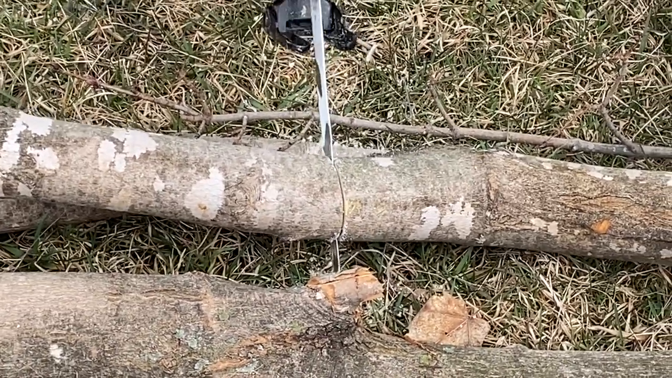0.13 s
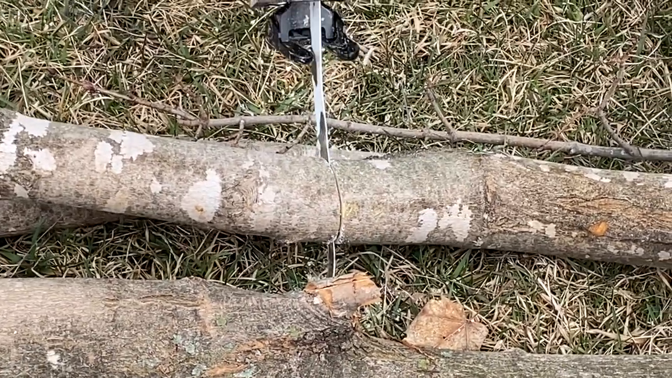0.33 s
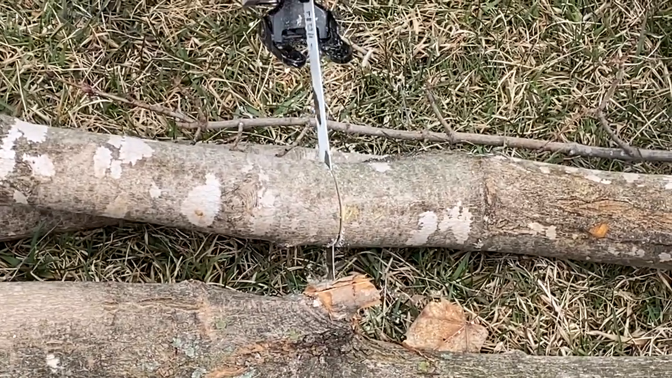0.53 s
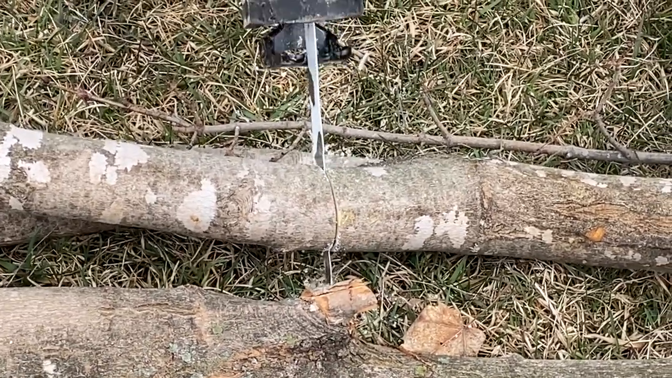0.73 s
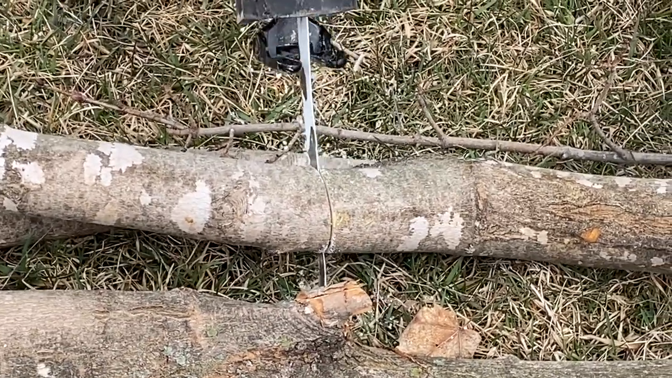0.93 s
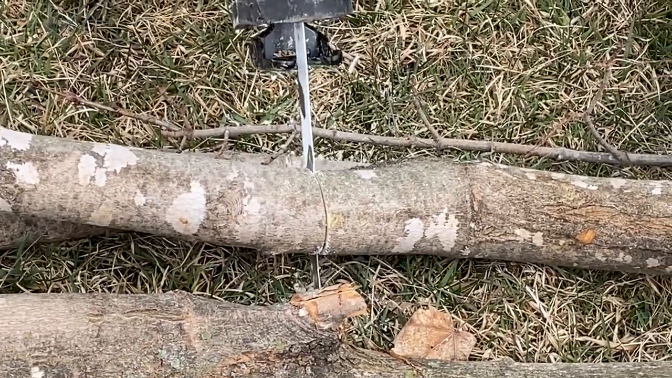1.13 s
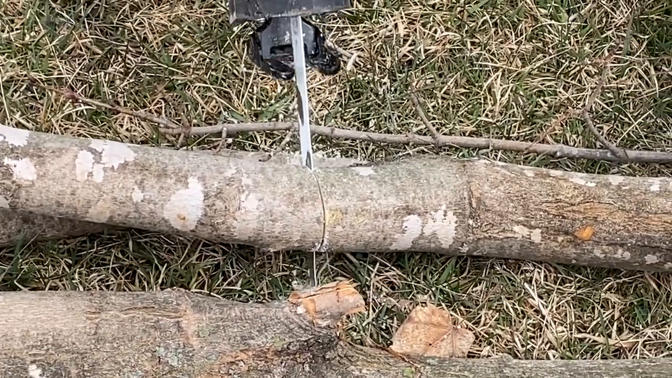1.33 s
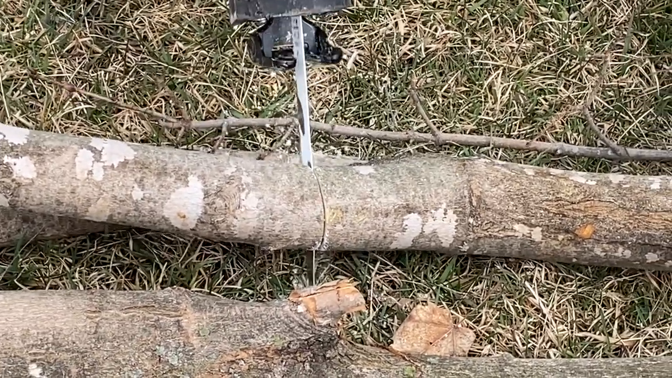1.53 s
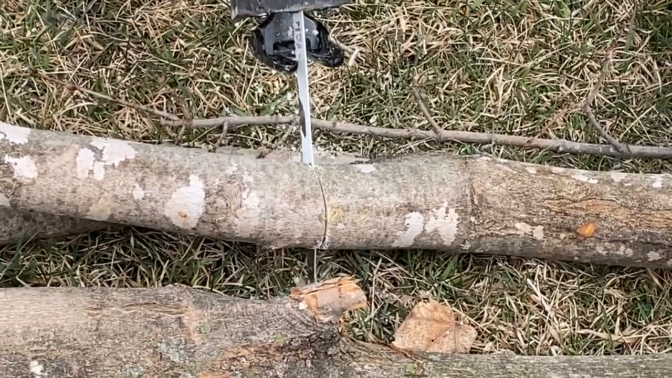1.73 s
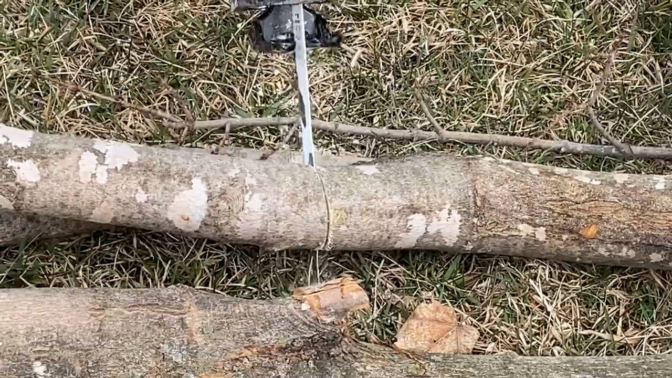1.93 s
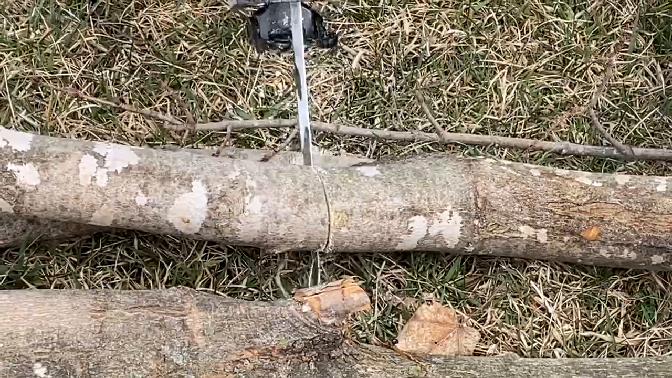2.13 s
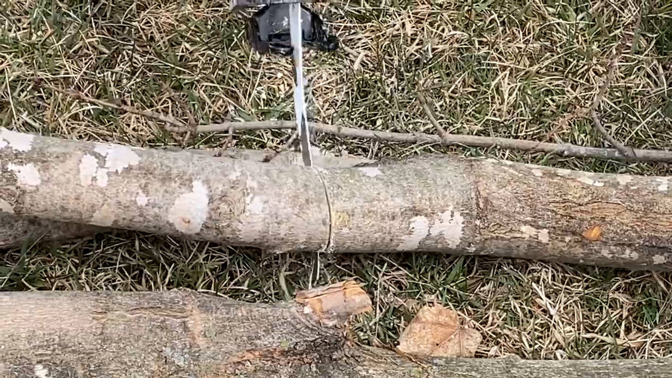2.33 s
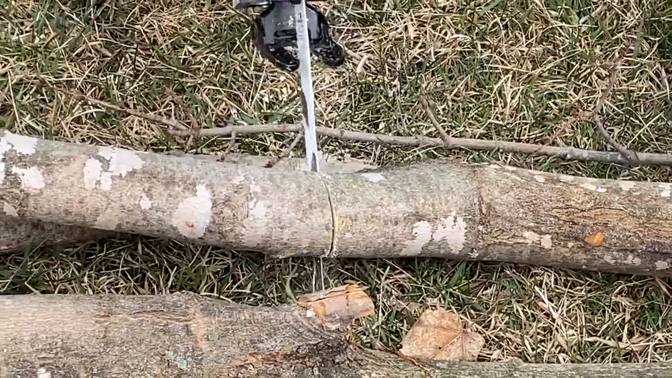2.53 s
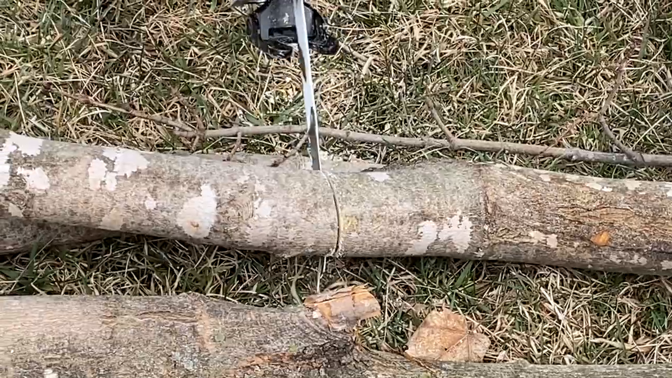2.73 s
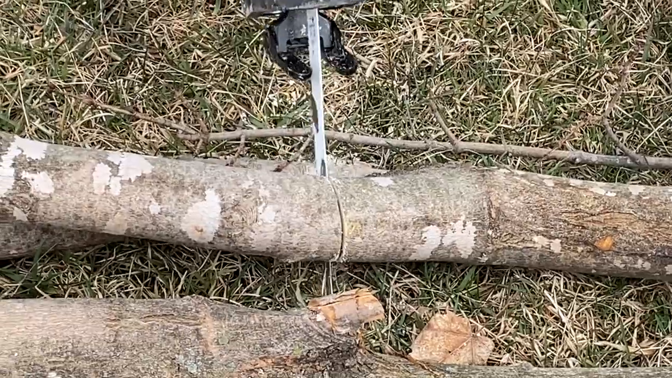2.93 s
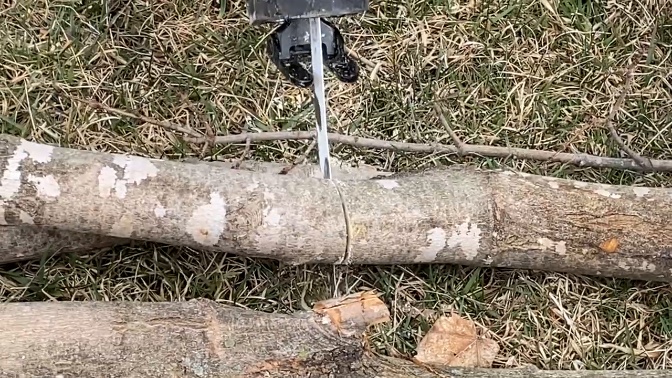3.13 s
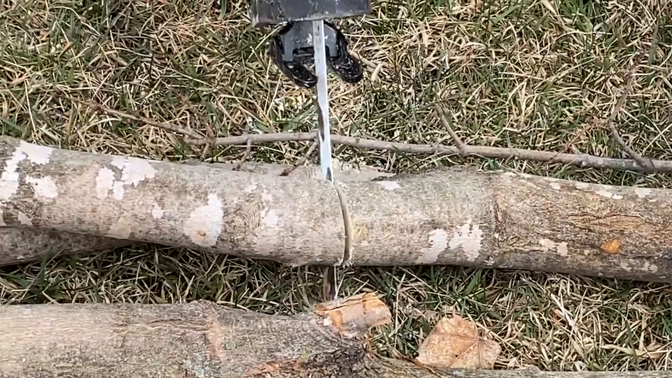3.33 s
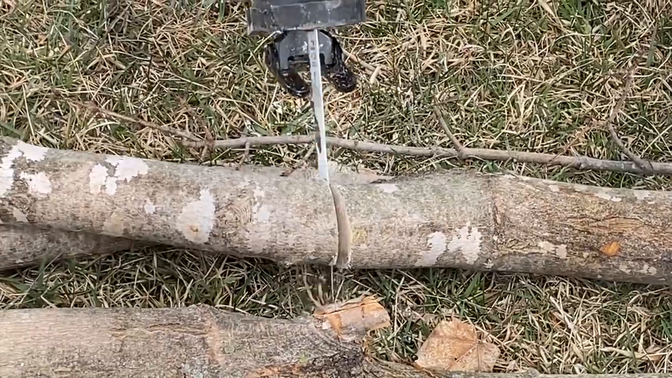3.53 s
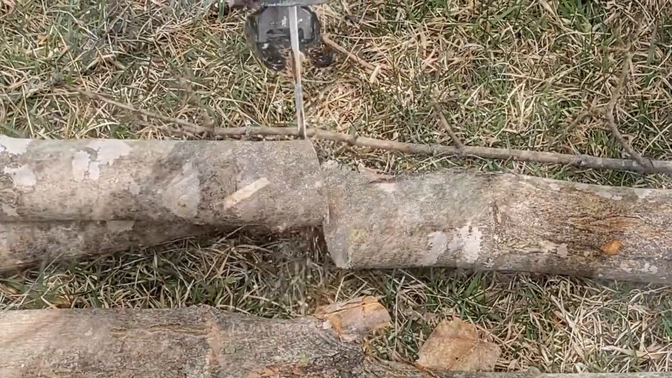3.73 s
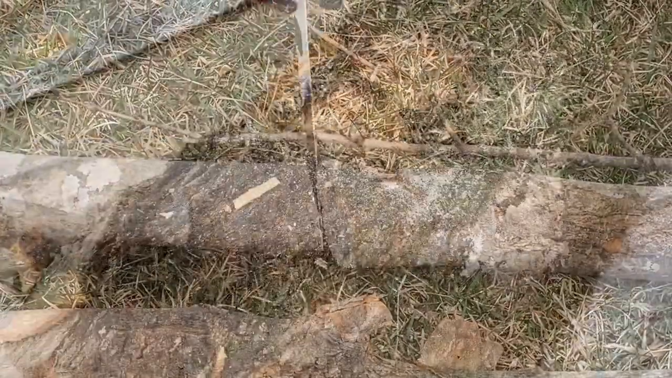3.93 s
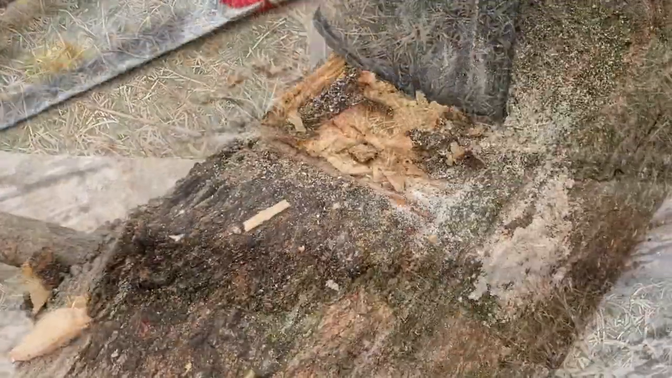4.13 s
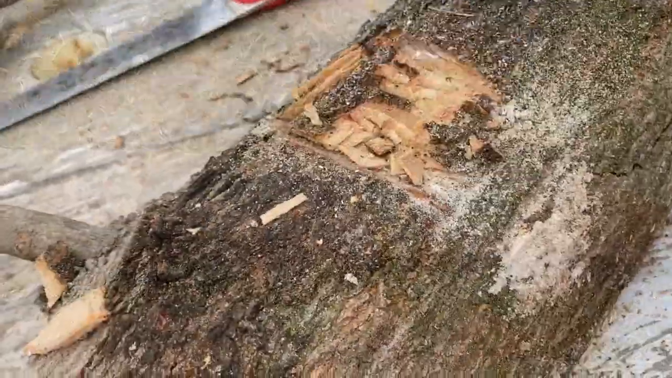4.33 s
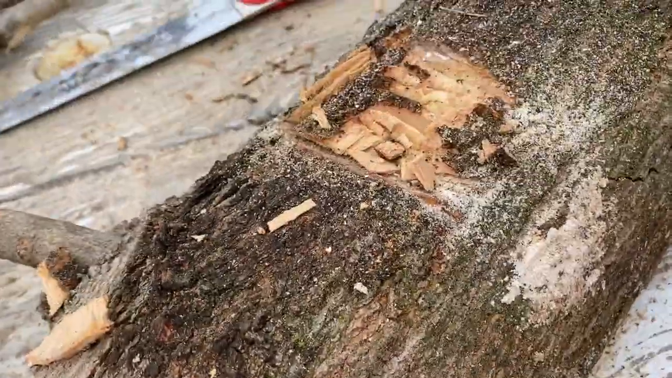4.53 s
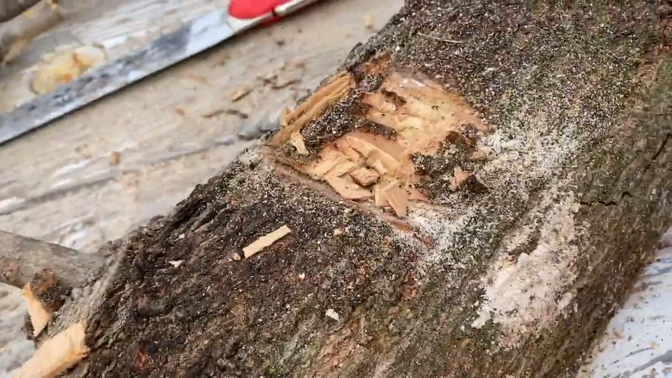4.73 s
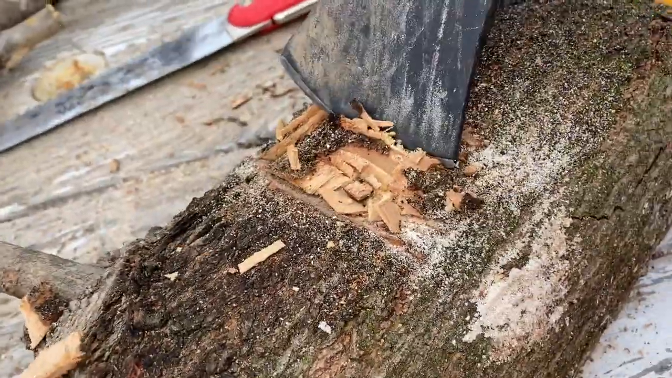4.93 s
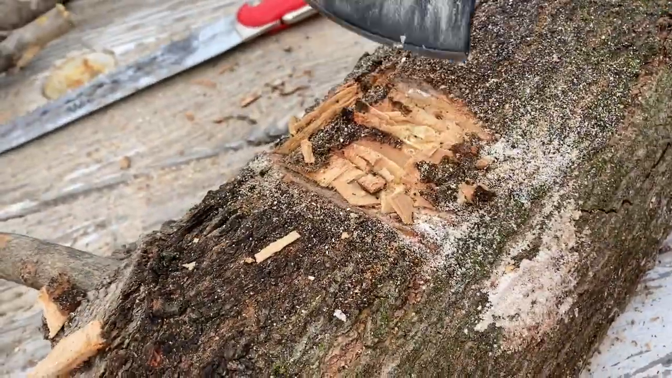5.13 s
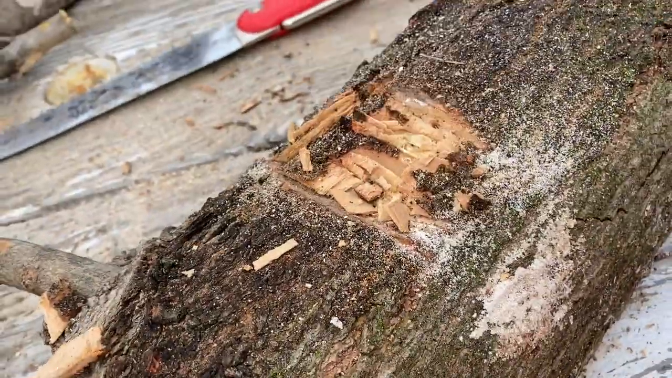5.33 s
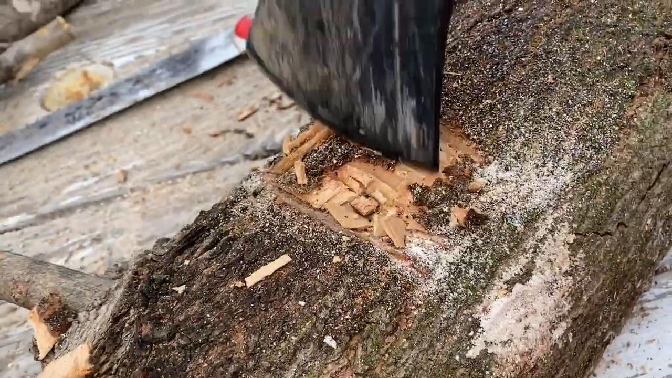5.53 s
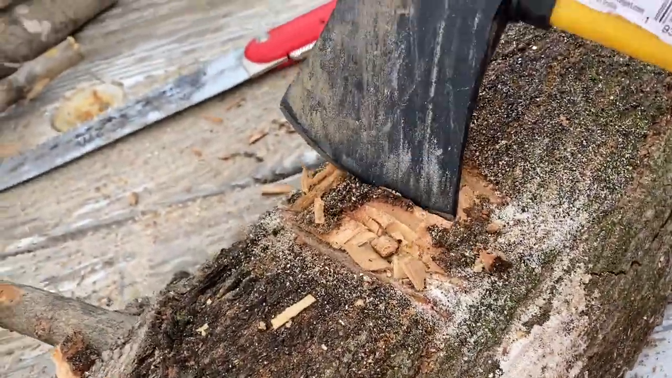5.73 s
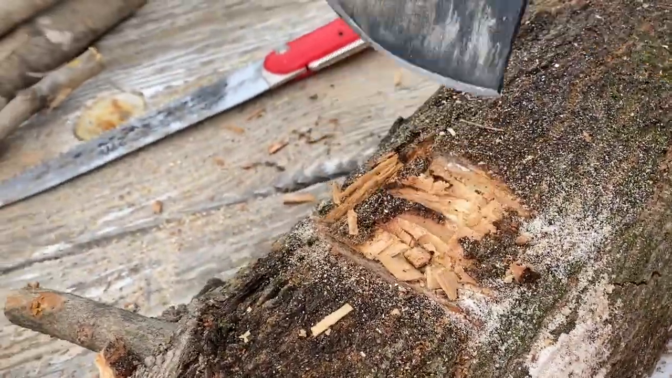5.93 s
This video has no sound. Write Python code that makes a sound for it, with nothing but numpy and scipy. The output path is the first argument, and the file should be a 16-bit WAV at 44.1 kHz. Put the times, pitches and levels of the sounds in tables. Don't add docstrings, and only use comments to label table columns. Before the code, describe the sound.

Close, harsh rattling saw cutting wood with wind thumps for nearly four seconds, followed by three separate sharp axe blows and falling chips.

```python
import sys
import numpy as np
from scipy import signal
from scipy.fft import rfft, irfft
from scipy.io import wavfile
from scipy.ndimage import uniform_filter1d, map_coordinates

SR = 44100
rng = np.random.default_rng(int(sys.argv[2]) if len(sys.argv) > 2 else 0)


def to_linear_factor(level_db):
    exponent = np.asarray(level_db, float) / 20
    return 10 ** exponent


def generate_wav(signal):
    frames = np.transpose(np.atleast_2d(signal))
    scaled = np.clip(frames, -1, 1) * 32767
    pcm = np.round(scaled).astype(np.int16)
    wavfile.write(sys.argv[1], SR, pcm)


N = 264600
T = np.arange(N) / SR
HZ = np.fft.rfftfreq(N, 1 / SR)

# (time [s], peak level [dB], time to fall 12 dB [s])
GUSTS = [(.65, -28, 0.0108), (.75, -21.5, 0.0799), (.99, -18, 0.0021), (1.07, -19, 0.0502),
         (1.18, -16.5, 0.0233), (1.3, -18.5, 0.0645), (1.53, -12, 0.0742), (1.86, -18.5, 0.115),
         (1.94, -18.5, 0.1387), (2.11, -14, 0.0798), (2.18, -18, 0.0594), (2.45, -17.5, 0.0604),
         (2.69, -10, 0.0446), (2.77, -16.5, 0.1081), (2.938, -14.5, 0.0746), (3.33, -26, 0.0792),
         (3.49, -26.5, 0.1754), (3.68, -27.5, 0.2065)]
# (time [s], level [dB])
BREEZE = [(0, -34), (.6, -37.5), (1.62, -30.5), (2.05, -24.5), (2.85, -27), (3, -35.5), (3.6, -40.5),
          (3.75, -29.5), (3.9, -28), (3.94, -46.5)]
# (time [s], ground shake [dB], its 60 dB fade [s], plank hum [dB], its 60 dB fade [s])
BLOWS = [
    (3.94, -25.5, 1, -70, 1),
    (4.044, -14, 0.44, -39, 1.1),
    (4.766, -26.5, 1., -34.5, 0.92),
    (5.54, -2.5, 0.2257, -34, 1.8),
    (5.72, -39.5, 1.83, -47.5, 1.8),
]
# (time [s], pitch [Hz], level [dB])
BIRD = [
    (5.315, 3718, -61),
    (5.325, 4260, -55),
    (5.337, 4970, -62),
    (5.345, 4100, -55),
    (5.36, 3650, -49),
    (5.37, 3400, -64),
]
# (frequency [Hz], left minus right [dB])
PORT_TILT = [(60, 0.0), (110, -0.5), (200, -0.5), (380, 0.5), (700, 3.5), (1290, 3.0), (2380, 0.5),
             (4400, 0.0)]
# (frequency [Hz], left leads by [radians])
PHASE_LEAD = [(0, 0), (1460, .8), (2150, 0.), (7350, 0), (8850, -np.pi), (9300, -np.pi), (11000, -2 * np.pi),
              (11450, -2 * np.pi), (13000, -3 * np.pi), (13650, -3 * np.pi), (15100, -4 * np.pi)]
# (start [s], end [s], first level [dB], last level [dB])
SWINGS = [(3.85, 3.954, -64, -66.5), (3.957, 4.045, -48, -49), (4.126, 4.318, -53.5, -55),
          (4.374, 4.583, -66.5, -64), (4.585, 4.757, -57.5, -49), (4.892, 5.001, -63, -52),
          (4.999, 5.066, -51.5, -54), (5.072, 5.325, -62.5, -63.5), (5.335, 5.525, -57.5, -51),
          (5.7, 5.83, -67, -42.5), (5.825, 6., -54, -67)]
# (frequency [Hz], density [dB per Hz])
RUSTLE_COLOUR = [(450, -18), (750, 0.5), (1200, -1), (1500, -3), (2100, 2.5), (3200, -8), (4500, -1),
                 (5400, -8.5), (6300, -2), (8000, -9), (11000, -8.5), (15500, -6)]
# (time [s], level [dB], pitch [Hz], 60 dB fade [s])
LOG_BUMPS = [(3.87, -30.5, 127.3, 0.17), (4.013, -22.5, 160, .08), (4.048, -18, 619.5, 0.067),
             (4.086, -20.5, 466.2, 0.038), (4.098, -14.5, 215.7, 0.11), (4.14, -33, 551.4, 0.1),
             (4.402, -47, 500.4, .1), (4.631, -49, 451.1, .1), (4.771, -14, 642.7, 0.074),
             (4.805, -11.5, 193.6, .15), (4.84, -26, 378.2, 0.061), (5.525, -25, 507, .1),
             (5.529, -32, 1612, .15), (4.757, -32.5, 1799, .15), (5.544, -12, 604, 0.049),
             (5.577, -15.5, 248.2, .15), (5.621, -34.5, 283, 0.071), (5.782, -47, 350, 0.13)]
# (time [s], peak level [dB], centre [Hz])
CHIPS = [(3.9599, -21, 5200), (3.9744, -40, 2810), (4.052, -20, 2500), (4.0584, -20, 3300),
         (4.0657, -10, 1340), (4.076, -22, 1700), (4.0805, -22, 1600), (4.0846, -8, 1210),
         (4.1184, -30.5, 2020), (4.1494, -49, 4150), (4.1794, -23.5, 4310), (4.2293, -36.5, 1690),
         (4.3884, -31.5, 4220), (4.4039, -32, 1520), (4.4473, -28.5, 3600), (4.4897, -25.5, 4220),
         (4.782, -7.5, 2607), (4.7881, -12.5, 1990), (4.7924, -22.5, 1350), (4.8182, -2, 1990),
         (4.8304, -49, 2140), (4.8395, -8.5, 1893), (5.1427, -35.5, 1780), (5.3812, -28, 1710),
         (5.3924, -28.5, 6450), (5.548, -12, 1900), (5.5544, -8, 1777), (5.559, -20, 2100),
         (5.572, -18, 1600), (5.584, -26, 2800), (5.5907, -14, 2200), (5.603, -26, 2400),
         (5.7339, -48, 2290), (5.7588, -44, 2533), (5.7823, -29.5, 1473), (5.8157, -17.5, 7503)]
# (start [s], end [s], level [dB])
SPLINTERS = [
    (4.057, 4.117, -39),
    (4.788, 4.847, -34),
    (5.547, 5.622, -37.5),
]
# (time [s], crack level [dB], thud level [dB])
CHOPS = [
    (4.0441, -8, -2),
    (4.7667, 2.5, 4),
    (5.5393, -5.5, 3),
]
# (length [s], fibre pitch [Hz], edge pitch [Hz], top end [dB])
CRACKS = [
    (.004, 1500, 6900, 4),
    (.0028, 3380, 9000, -4),
    (0.003, 1500, 9500, 7),
]
# (pitch drop [Hz], end pitch [Hz], length [s], pitch fall time [s])
THUDS = [
    (920, 95.1, .024, .0044),
    (820, 88, 0.025, .0065),
    (790, 103.5, 0.016, .0062),
]
# (pitch [Hz], level [dB], 60 dB fade [s])
LOG_MODES = [
    [(65.53, -10.5, 2.37), (106.18, 0.5, 0.44), (173.02, -4.5, 0.34), (295.28, -7.5, 0.27),
     (504.5, -20, 0.078), (630, -39, 1.5), (1244.9, -27, 0.15)],
    [(92.86, 2.5, 0.24), (175.87, -0.5, 0.19), (286, -16, 0.52), (334.62, -5.5, 0.19), (420.4, -26, 0.18),
     (704, -28.5, 0.067), (890.58, -29.5, 0.082)],
    [(107.79, 5, 0.14), (160, -2.5, 0.13), (293, -16.5, 0.11), (386.47, -10, 0.19), (544.3, -32, 0.14),
     (1136.3, -37.5, 0.16), (1286.4, -36, 0.11)],
]
LOG_TRIM = [-6, -5, -5]
# (pitch [Hz], width [Hz], level [dB])
SPLIT_MODES = [
    [(2590, 240, -8), (3420, 250, 0), (4760, 260, -4), (5580, 190, -8), (6500, 280, -4), (7530, 390, -4)],
    [(3330, 220, 0), (3810, 270, 0), (4870, 290, -9), (6330, 250, -9), (7730, 330, -5), (8740, 250, -18)],
    [(2100, 290, 0), (3350, 510, -4), (4580, 210, -13), (5540, 250, -13), (7070, 280, -4), (8220, 420, -12)],
]
SPLIT_TRIM = [-14, -6, -12]
# (time [s], pitch [Hz], level [dB], 60 dB fade [s])
STEEL = [(4.79, 4200, -40, .2), (5.56, 4150, -36, .17), (5.06, 6100, -53, .3), (5.82, 6100, -56, .15),
         (5.79, 3420, -37, .14), (5.79, 2900, -42, .12), (4.12, 445, -55, .5), (4.85, 450, -39, .55),
         (5.62, 452, -48, .9), (5.7, 820, -62, 2.), (5.545, 315, -5, .13), (4.09, 300, -16, .2),
         (4.0445, 1300, 1, .035), (4.767, 1500, 0, .03), (5.541, 1350, -2, .03), (4.086, 1400, -27, .07),
         (4.819, 2000, -26, .05), (4.404, 1550, -44, .05)]
# (time [s], peak level [dB])
BLADE_SLAPS = [(0.1017, -11), (0.1351, -8), (0.2628, -9), (0.2942, -8), (0.3252, -8), (0.3865, -9),
               (0.4174, -9), (0.4793, -6), (0.5107, -8), (0.5417, -9), (0.6345, -8), (0.6654, -10),
               (0.6973, -7), (0.7292, -9), (0.9248, -10), (0.9582, -9), (0.9901, -9), (1.0231, -10),
               (1.0565, -5), (1.0894, -5), (1.1218, -4), (1.2191, -7), (1.2526, -7), (1.2855, -6),
               (1.3179, -11), (1.3518, -7), (1.3848, -8), (1.4506, -11), (1.516, -8), (1.5494, -11),
               (1.5818, -6), (1.6477, -7), (1.7469, -8), (1.7794, -6), (1.8118, -7), (1.8442, -8),
               (1.8771, -9), (1.9734, -11), (2.0383, -10), (2.0717, -8), (2.1675, -10), (2.2633, -11),
               (2.4034, -8), (2.4967, -6), (2.5581, -7), (2.575, -5), (2.6359, -9), (2.6683, -8),
               (2.6993, -8), (2.8245, -9), (2.8888, -8), (3.0649, -7), (3.0944, -7), (3.1223, -5),
               (3.2076, -8), (3.3209, -6), (3.3493, -7), (3.489, -8), (3.5289, -7), (3.6012, -13)]
# (time [s], peak level [dB])
SHOE_KNOCKS = [(0.0498, -12), (0.0827, -11), (0.1491, -11), (0.2453, -11), (0.4319, -12), (0.4933, -11),
               (0.6484, -11), (0.6799, -10), (0.7108, -7), (0.7442, -11), (0.7761, -10), (0.8086, -9),
               (0.841, -7), (0.8739, -11), (0.9063, -8), (0.9398, -10), (0.9722, -8), (1.0051, -8),
               (1.1029, -10), (1.1682, -8), (1.2007, -9), (1.2336, -9), (1.267, -7), (1.2999, -7),
               (1.3329, -7), (1.3663, -9), (1.3987, -12), (1.4646, -9), (1.4975, -9), (1.5299, -11),
               (1.5638, -9), (1.6297, -10), (1.6621, -11), (1.6955, -10), (1.728, -10), (1.7928, -10),
               (1.8262, -9), (1.8582, -10), (1.8911, -12), (1.923, -10), (1.9555, -10), (2.0198, -9),
               (2.0522, -8), (2.1495, -9), (2.1814, -11), (2.2134, -9), (2.2772, -11), (2.3406, -10),
               (2.372, -9), (2.5586, -10), (2.6189, -12), (2.6504, -9), (3.0884, -10), (3.1173, -12),
               (3.1457, -13), (3.2031, -11), (3.2311, -12), (3.259, -11), (3.6735, -13), (3.7249, -11)]
# (time [s], peak level [dB])
BRANCH_BOOMS = [(0.019, -12), (0.17, -12), (0.699, -8), (0.732, -12), (0.797, -12), (0.861, -12),
                (0.927, -12), (0.993, -9), (1.059, -11), (1.092, -9), (1.124, -8), (1.189, -13),
                (1.222, -9), (1.289, -10), (1.388, -11), (1.421, -9), (1.453, -12), (1.486, -12),
                (1.519, -11), (1.584, -10), (1.631, -11), (1.696, -12), (1.716, -12), (1.782, -11),
                (1.815, -11), (1.847, -11), (1.925, -9), (2.009, -10), (2.055, -9), (2.152, -9),
                (2.184, -10), (2.249, -9), (2.312, -8), (2.405, -10), (2.638, -7), (2.683, -10),
                (2.746, -10), (2.778, -12), (2.918, -12), (3.033, -9), (3.061, -9), (3.091, -10),
                (3.147, -12), (3.176, -9), (3.204, -13), (3.261, -13), (3.309, -9), (3.403, -12),
                (3.52, -12), (3.792, -14)]
# (time [s], strokes done [count])
STROKES = [(0, .39), (.2, 6.51), (.6, 19.39), (.8, 25.71), (1.05, 33.29), (1.2, 37.94), (1.8, 56.16),
           (2.2, 68.49), (2.4, 74.84), (2.6, 81.27), (3, 94.3), (3.4, 108.38), (3.6, 115.65), (4, 130.4)]
# (time [s], level [dB], knock strength [0-1])
CUT = [(0, -13, .93), (.55, -12, 0.78), (.8, -13.5, 1), (1.7, -14, 1), (2.05, -11, 0.68),
       (2.3, -10.5, 0.61), (2.7, -10.5, 0.65), (3.05, -12, 0.9), (3.3, -10.5, 0.59), (3.55, -10.5, 0.62),
       (3.7, -14, .55), (3.8, -11.5, 0.53), (4, -9.5, 1)]
# (time [s], share of the knock [0-1])
BITE = [(0, .85), (.7, .9), (.9, 1), (2.7, 1), (2.95, .7), (3.06, .1), (3.3, .15), (3.5, .35), (4, .4)]
# (pitch [Hz], width [Hz], level [dB], pull knock over rasp [dB],
# push knock place [strokes], push knock over rasp [dB])
BODY = [(350, 280, -17.5, -3, .5, 0), (644, 287.9, -9, 4, .6, -5.5), (950, 200, -6.5, -6.5, .66, -6),
        (1328.6, 235.7, -7.8, -6, .6, -10), (1592.7, 394.97, -5.5, -21.5, 0.75, -9),
        (1893.1, 320.67, -8.5, -14.5, 0.77, -9), (2360, 280, -12.5, 4, 0.65, -19),
        (2798.4, 210, -12, -6.5, 0.54, -13.5), (3316.8, 300, -11, -15.5, .58, -6),
        (3430, 270, -10.5, -9.5, .58, -6), (4596.6, 850, -14.5, -10.5, 0.41, -15.5),
        (5846.4, 897.5, -15.5, -14, 0.43, -11.5), (6800, 1000, -19, -12.5, .5, -16.5),
        (7500, 500, -18.5, -10, .5, -14), (8700, 1300, -19, -8, .5, -14),
        (10300, 1100, -14.5, -6.5, .6, -15), (12000, 2000, -19, -6.5, .6, -15),
        (14406, 2400, -15, -8, 1, -9.5)]
# (multiple of stroke rate [count], level [dB])
HUM = [(4, -30.5), (5, -21.5), (6, -26), (7, -30), (8, -32), (9, -25.5), (10, -33), (11, -24.5), (12, -23),
       (13, -24.5), (14, -27), (16, -28.5), (18, -18.5)]


def unit(x):
    return x / np.sqrt(np.mean(x ** 2))


def curves(table, off_db=-120):
    s, *columns = np.transpose(table)
    return [np.interp(T, s, column, off_db, off_db) for column in columns]


def band(x, hz, width):
    return signal.lfilter(*signal.iirpeak(hz, hz / width, SR), x)


def walk(rate):
    hold = int(SR / rate)
    steps = np.repeat(rng.standard_normal(N // hold + 1), hold)
    return 0.87 * uniform_filter1d(steps, hold)[:N]


def add(out, s, x):
    i = int(s * SR)
    out[i:i + len(x)] += x[:N - i]


def ring(hz, db, t60, rise_s):
    t = T[:int(SR * min(1.2 * t60, 1))]
    return to_linear_factor(db) * np.sin(2 * np.pi * hz * t) * (1 - np.exp(-t / rise_s)) * to_linear_factor(-60 * t / t60)


def left_right(x, states=(0,), wander_hz=300):
    hz, db = np.transpose(PORT_TILT)
    tilt = np.interp(np.log(HZ + 1), np.log(hz), db)
    state = np.repeat(rng.choice(states, N // 2048 + 1), 2048)[:N]
    out, spectrum = 0, rfft(x)
    for k in states:
        lead = np.interp(HZ + k * wander_hz * (HZ > 6000), *np.transpose(PHASE_LEAD))
        half = to_linear_factor(tilt / 2) * np.exp(.5j * lead)
        chosen = uniform_filter1d(1. * (state == k), size=256)
        out = out + chosen * irfft(spectrum * np.array([half, 1 / half]), N)
    return out


def wind():
    def rumble():
        air = rng.standard_normal(N)
        low = band(band(air, 70, 62), 70, 72)
        return unit(low + 0.31816 * band(band(air, 132, 120), 132, 130))

    mid, side = rumble(), rumble()
    db = curves(BREEZE)[0]
    for s, peak_db, fall_s in GUSTS:
        db = np.maximum(db, peak_db - 12 * np.abs(T - s) / fall_s)
    return to_linear_factor(db) * (mid + (.06 * mid + 0.14 * side) * np.array([[1], [-1]]))


def yard():
    rumble_db, hum_db, start_s = -45.5, -60, 4.2
    shake_rise_s, hum_rise_s = 0.025, .09
    fade = ((T - start_s) / .1).clip(0, 1)
    shake, buzz = to_linear_factor(rumble_db) * fade, to_linear_factor(hum_db) * fade
    for s, shake_db, shake_t60, plank_db, plank_t60 in BLOWS:
        t = (T - s).clip(0)
        shake = shake + to_linear_factor(shake_db - 60 * t / shake_t60) * (1 - np.exp(-(t / shake_rise_s) ** 2))
        buzz = buzz + to_linear_factor(plank_db - 60 * t / plank_t60) * (1 - np.exp(-(t / hum_rise_s) ** 4))
    rumble = band(band(rng.standard_normal(N), 60, 70), 60, 70)
    rumble = unit(rumble + 0.16 * band(band(rng.standard_normal(N), 110, 100), 170, 150))
    hum = band(band(rng.standard_normal(N), 286, 16), 286, 30)
    hum = unit(hum + .1 * band(band(rng.standard_normal(N), 445, 18), 445, 30))
    return shake * rumble + buzz * hum


def bird():
    hz, db = curves(BIRD)
    return to_linear_factor(db) * np.sin(2 * np.pi * np.cumsum(hz) / SR)


def swings():
    edge_s, out = .018, 0
    for start, end, first_db, last_db in SWINGS:
        edge = (np.minimum(T - start, end - T) / edge_s + .5).clip(0, 1)
        out = out + edge * to_linear_factor(np.interp(T, (start, end), (first_db, last_db)))
    return out


def rustle(alike=.85):
    hz, db = np.transpose(RUSTLE_COLOUR)
    colour = to_linear_factor(np.interp(np.log(HZ + 1), np.log(hz), db))
    noise = rng.standard_normal((3, N)) * to_linear_factor(1.4 * walk(60))
    noise = unit(irfft(rfft(noise) * colour, N))
    level = to_linear_factor(4.0) * swings() + to_linear_factor(-62.0) * (T > 3.85)
    return level * (alike * left_right(noise[0]) + (1 - alike) * noise[1:])


def log_bumps():
    out, t = np.zeros(N), T[:SR // 4]
    for s, db, hz, t60 in LOG_BUMPS:
        bump = band(band(rng.standard_normal(len(t)), hz, .9 * hz), hz, .9 * hz)
        add(out, s, to_linear_factor(db) * unit(bump) * (1 - np.exp(-t / 0.0026)) * to_linear_factor(-60 * t / t60))
    return out


def chips():
    out, t = np.zeros(N), T[:SR // 50]
    for s, db, hz in CHIPS:
        click = rng.standard_normal(len(t)) * np.exp(-t / .0007)
        tone = np.sin(2 * np.pi * hz * t) * (1 - np.exp(-t / .0003)) * np.exp(-t * hz / 1.6)
        tick = .4 * click + tone
        add(out, s, to_linear_factor(db - 6) * tick / np.abs(tick).max())
    grit = rng.standard_normal(N) * to_linear_factor(4.5 * walk(300))
    crackle = band(grit, 2000, 3000) + .5 * band(grit, 4200, 900)
    crackle = unit(crackle + 1.2 * band(grit, 8600, 2000) + .6 * band(grit, 15000, 2000))
    for start, end, db in SPLINTERS:
        span = slice(int((start - .01) * SR), int((end + .01) * SR))
        from_middle = (T[span] - (start + end) / 2) / ((end - start) / 2)
        out[span] += to_linear_factor(db) * crackle[span] / (1 + from_middle ** 12)
    return out


def crack(crack_s, fibre_hz, edge_hz, top_db):
    t = T[:SR // 10]
    snap = rng.standard_normal(len(t))
    snap = .45 * band(snap, fibre_hz, 3000) + band(snap, edge_hz, 4100) + to_linear_factor(top_db) * band(snap, 14000, 5200)
    return 6 * snap * (t / crack_s) ** 2 * np.exp(2 - 5 * t / crack_s)


def thud(drop_hz, end_hz, thud_s, fall_s):
    t = T[:SR // 10]
    hz = end_hz + drop_hz * np.exp(-(t / fall_s) ** 2)
    shape = (1 - np.exp(-t / 0.003)) * np.exp(-(t / thud_s) ** 4)
    return shape * np.sin(2 * np.pi * np.cumsum(hz) / SR)


def chops():
    out = np.zeros(N)
    for i, (s, crack_db, thud_db) in enumerate(CHOPS):
        add(out, s + .0007, to_linear_factor(crack_db + 1.5) * crack(*CRACKS[i]))
        for hz, width, db in SPLIT_MODES[i]:
            add(out, s + .0012, ring(hz, db + SPLIT_TRIM[i], np.clip(6 / width, .01, .022), .0012))
        crack_s = CRACKS[i][0]
        add(out, s + .5 * crack_s, to_linear_factor(thud_db) * thud(*THUDS[i]))
        for hz, db, t60 in LOG_MODES[i]:
            add(out, s + .006, ring(hz, db + LOG_TRIM[i], min(t60, .25), 0.0038))
    for s, hz, db, t60 in STEEL:
        tone = ring(hz, db, t60, 0.0092)
        add(out, s, tone * to_linear_factor(4.5 * walk(120)[:len(tone)]))
    return out


def slaps(spread=.008, contrast=.4, freed_db=3):
    out, t = np.zeros(N), T[:SR // 100]
    # (events, pitch [Hz], gain [dB], 60 dB fade [s], rise [s], tick [dB])
    contacts = ((BLADE_SLAPS, 3345, 8.5, .018, .002, -16),
                (SHOE_KNOCKS, 2360, 8, .017, .002, -9),
                (BRANCH_BOOMS, 945, 6, .032, .003, -30))
    for table, hz, gain_db, t60, rise_s, tick_db in contacts:
        for s, db in table:
            pitch = hz * (1 + spread * rng.standard_normal())
            ring_db = db + contrast * (db + 6) + gain_db - freed_db * (s > 2.95)
            add(out, s - .0005, ring(pitch, ring_db, t60, rise_s))
            tick = band(rng.standard_normal(len(t)) * np.exp(-t / .0018), 5500, 7000)
            add(out, s, to_linear_factor(db + tick_db) * tick)
    return out


def turn_knocks(turns, bite, pull_db, place, push_db, scatter_db=2., jitter=.015):
    chance = rng.standard_normal((200, 4))[:131]
    strokes = np.arange(131)
    pull = np.searchsorted(turns, strokes - .05 + jitter * chance[:, 0])
    push = np.searchsorted(turns, strokes + place - .05 + jitter * chance[:, 1])
    pull_bite, push_bite = bite[pull.clip(0, N - 1)], bite[push.clip(0, N - 1)]
    knock = np.zeros(N + 1)
    knock[pull] = to_linear_factor(pull_db + scatter_db * chance[:, 2]) * pull_bite
    push_level = to_linear_factor(push_db) + .55 * to_linear_factor(pull_db) * (1 - push_bite)
    knock[push] = to_linear_factor(scatter_db * chance[:, 3]) * push_level
    return knock[:N]


def part_level(hz, bite, case_db):
    if hz < 900:
        return case_db
    if hz < 1000:
        return 1.0583 - 5 * (T / 1.9231 - 1) ** 2
    if 3000 < hz < 3600:
        return 0.4122 + 20 * np.log10(0.29275 + (bite if hz < 3400 else 1 - bite))
    return -1.5878 * (1 - bite) * (hz > 3600)


def saw(sharp=5.5, swell=1.6, memory=6., repeat_hz=874.0, grit_db=2.5):
    (level_db, effort), bite = curves(CUT, 0), curves(BITE, 0)[0]
    case_db = -0.7452 - 0.55 * (level_db - CUT[0][1]) - 1.2 * (1 - bite)
    level_db = level_db - 480 * (T - 3.806).clip(0)
    turns = np.interp(T, *np.transpose(STROKES))

    pattern = rng.standard_normal((200, 1400))
    repeat = unit(map_coordinates(pattern, [turns / memory, turns % 1 * 1399], order=1))
    teeth = unit(rng.standard_normal(N) * to_linear_factor(grit_db * rng.exponential(size=N)))

    half = (2 * turns + .5).astype(int)
    luck = to_linear_factor(2.2 * rng.standard_normal(400).clip(-2, 1.2))[half]
    grip = luck * np.where(half % 2, 1.4 - .4 * bite, bite) * effort
    force = 1 + swell * grip * np.exp(sharp * (np.cos(4 * np.pi * (turns - .03)) - 1))

    out, stroke = 0, rng.standard_normal(200)[turns.astype(int)]
    for n, (hz, width, db, pull_db, place, push_db) in enumerate(BODY):
        knock = turn_knocks(turns, bite, pull_db, place, push_db)
        share = np.exp(-hz / repeat_hz)
        rasp = unit(force * (np.sqrt(share) * repeat + np.sqrt(1 - share) * teeth))
        drive = rasp + np.sqrt(SR / 31) * effort.clip(0, 1.5) * knock
        part_db = part_level(hz, bite, case_db)
        part_db = part_db + 1.1 * walk(12) + 1.5 * (hz > 3600) * stroke
        facing = 1
        if hz < 900:
            facing = (-1) ** n
        elif hz > 4000:
            facing = -(-1) ** n
        sound = unit(band(band(drive, hz, 1.3597 * width), hz, 1.3544 * width))
        out = out + facing * to_linear_factor(db + part_db) * sound
    out = out / np.std(out[:3 * SR])
    for order, db in HUM:
        phase = order * turns + rng.random() + .15 * walk(6)
        out += to_linear_factor(db + 1.5 + case_db + 2.63 * walk(5)) * np.sin(2 * np.pi * phase)
    return to_linear_factor(level_db - .35) * out


def ground_echo(x):
    scatter = rng.standard_normal(4000) * to_linear_factor(-60 * T[:4000] / .12)
    echo = signal.fftconvolve(x, scatter / np.linalg.norm(scatter))[:N]
    return 1.9 * band(echo, 250, 400) + band(echo, 1300, 1500)


def scene():
    side = np.array([[1], [-1]])
    far = to_linear_factor(-.8 * side) * yard()
    chopping = chops() + log_bumps() + chips() + bird()
    cutting = saw() + slaps()
    ground = to_linear_factor(-13.5) * side * ground_echo(cutting + .6 * chopping)
    near = left_right(cutting, (-1, 0, 1)) + to_linear_factor(1.5 * side) * left_right(chopping)
    return near + far + ground + wind() + rustle()


def top_cut(x):
    return signal.sosfilt(signal.butter(12, 16270, fs=SR, output="sos"), x)


def record(dry):
    top_hz = 15750
    low_pass = signal.ellip(12, .2, 60, top_hz, fs=SR, output="sos")
    mix = np.clip(signal.sosfilt(low_pass, dry), -1, 1)
    return top_cut(mix)


dry = scene()
out = record(dry)
generate_wav(out)
```